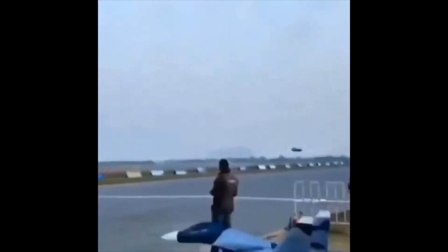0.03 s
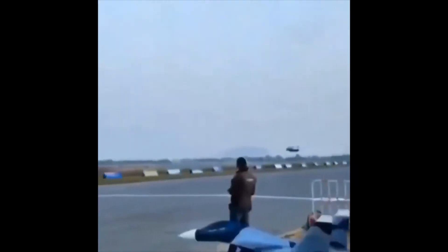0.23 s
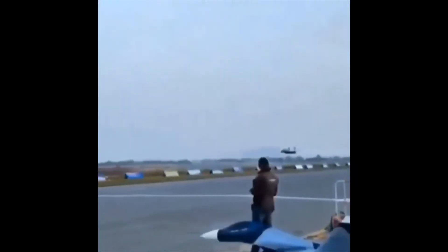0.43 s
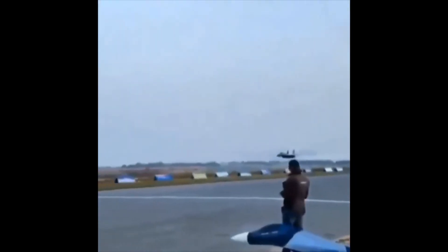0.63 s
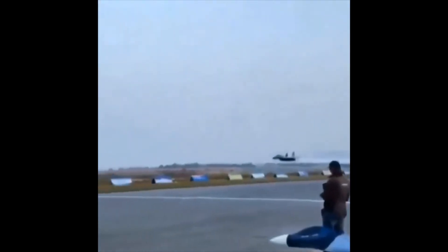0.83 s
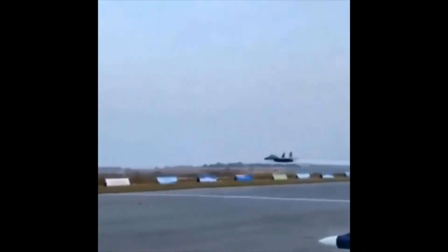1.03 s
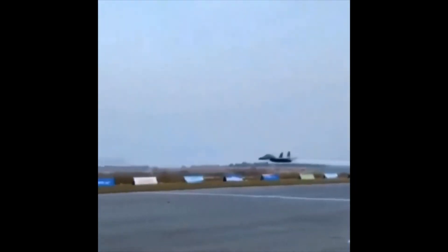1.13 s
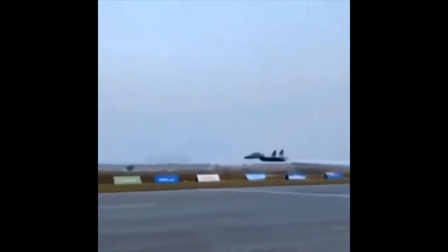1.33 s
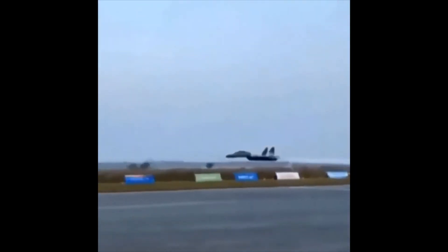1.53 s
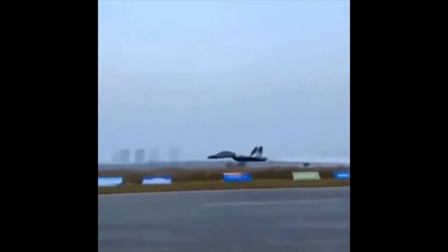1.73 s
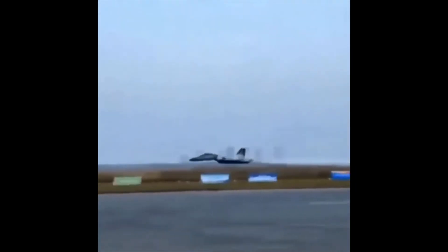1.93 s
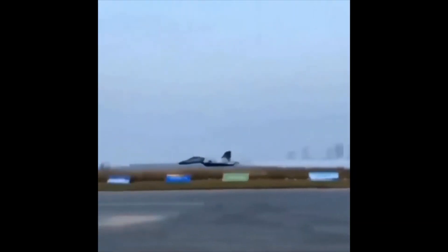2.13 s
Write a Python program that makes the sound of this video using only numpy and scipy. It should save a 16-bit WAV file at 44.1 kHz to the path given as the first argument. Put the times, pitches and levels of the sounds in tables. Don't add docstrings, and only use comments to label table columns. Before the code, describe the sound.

A fighter jet approaches low over an open airfield, its broad crackling roar swelling as howl and high fan whine flicker through; exhaust rumble deepens towards the end, with wind buffets on a thin, glitchy phone microphone.

```python
import sys
import numpy as np
from scipy import signal
from scipy.fft import rfft, irfft
from scipy.io import wavfile
from scipy.ndimage import uniform_filter1d

SR = 44100
rng = np.random.default_rng(int(sys.argv[2]) if len(sys.argv) > 2 else 0)


def file_out(sig):
    cols = np.atleast_2d(sig).T
    lim = np.clip(cols, -1, 1)
    pcm = np.round(lim * 32767).astype(np.int16)
    wavfile.write(sys.argv[1], SR, pcm)


def voltage_ratio(level):
    return 10 ** (np.asarray(level, float) / 20)


N = 96358
HOP, SIZE = 128, 1024
CROSSOVER_HZ = 5250
SMOOTH_BELOW_HZ = 700


def evened(x):
    return x / np.sqrt(np.mean(abs(x) ** 2) + 1e-20)


def bell(x, centre, width):
    return np.exp(-.5 * ((x - centre) / width) ** 2)


def plateau(x, centre, half):
    return np.exp(-((x - centre) / half) ** 4)


def band(hz, centre_hz, width_hz):
    shape = bell(hz, centre_hz, width_hz / 2)
    return shape / shape.sum(axis=0)


def grid():
    hz = np.fft.rfftfreq(SIZE, 1 / SR)[:, None]
    t = np.arange(N // HOP + 9)[None] * HOP / SR
    return hz, t


def noise(power):
    real, imaginary = rng.standard_normal(power.T.shape + (2,)).T
    spectrum = real + 1j * imaginary
    white = signal.istft(spectrum, nperseg=SIZE, noverlap=SIZE - HOP)[1]
    shaped = np.sqrt(power * len(power)) * spectrum
    return signal.istft(shaped, nperseg=SIZE, noverlap=SIZE - HOP)[1][:N] / np.std(white)


def patches(bins, frames):
    hz, t = grid()
    field = rng.standard_normal((t.size, hz.size)).T
    for _ in range(2):
        field = uniform_filter1d(field, size=bins, axis=0)
        field = uniform_filter1d(field, size=frames, axis=1)
    return evened(field)


def read(points, hz):
    f, value = np.transpose(points)
    return np.interp(np.log(hz + 1), np.log(f + 1), value)


# time_s, level_db
APPROACH = [(0.08, -41), (0.5, -36.5), (0.51, -46), (0.63, -33), (0.65, -37.5), (1.01, -37.5), (1.2, -33.5),
            (1.23, -35), (1.37, -32.5), (1.39, -34.5), (2.17, -33.5), (2.18, -33)]
# frequency_hz, level_db
FAR = [(18, -27), (130, 2.5), (1950, 2.5), (2350, -12.5), (3000, -12.5), (4900, -2), (5600, -26.5),
       (10000, -20)]
# frequency_hz, level_db
NEAR = [(18, -2.5), (800, -3), (1950, -3), (2350, -6.5), (3000, -7), (4900, -10.5), (5500, -16),
        (10000, -18.5)]


def roar(hz, t):
    near = np.clip((t - .11) / (.8 - .11), 0, 1)
    power = voltage_ratio(2 * ((1 - near) * read(FAR, hz) + near * read(NEAR, hz)))
    level_db = np.interp(t, *np.transpose(APPROACH)) - 3
    reference = (hz[:, 0] > 2200) & (hz[:, 0] < 8000)
    return power * voltage_ratio(2 * level_db) / power[reference].sum(axis=0)


def crackle(body):
    rate_per_s, spread_db, level_db = 1500, 3.0, -16
    strength_db = spread_db * np.minimum(rng.exponential(1, N), 5)
    size = voltage_ratio(strength_db) * (rng.random(N) < rate_per_s / SR)
    u = np.arange(0, .002, 1 / SR) / .0001
    front = (1 - u) * np.exp(-u)
    shocks = evened(np.convolve(size, front)[:N])
    loudness = np.sqrt(abs(uniform_filter1d(body ** 2, size=4000)))
    return voltage_ratio(level_db) * shocks * loudness


# centre_s, length_s, level_db
GUSTS = [
    (0.238, .03, -46.5),
    (0.608, .08, -66),
    (.95, .08, -55),
    (1.604, .03, -40),
    (1.877, .04, -50),
    (2.05, .05, -37.5),
    (2.18, .03, -28),
]


def wind():
    t = np.arange(N) / SR
    steady = voltage_ratio(2 * -53.5)
    power = steady + sum(voltage_ratio(2 * db) * bell(t, s0, span) for s0, span, db in GUSTS)
    spectrum = rfft(rng.standard_normal(N)) * bell(np.fft.rfftfreq(N, 1 / SR), 56.4, 11.8)
    return np.sqrt(power) * evened(irfft(spectrum, N))


# time_s, pitch_hz
PITCH = [(0, 9360), (1.0, 9410), (1.3, 9210), (1.7, 9110), (1.9, 8880), (2.2, 8860)]


def whine_pitch(t):
    return np.interp(t, *np.transpose(PITCH))


# centre_s, length_s, pitch_hz, width_hz, level_db
BEAMS = [(0.42, 0.069, 1620, 440, -34), (0.604, 0.027, 525, 40, -43.5), (0.84, 0.085, 584, 65, -41),
         (0.712, 0.055, 650, 190, -39.5), (1.95, .012, 7900, 1000, -40.5), (2.03, 0.063, 1240, 200, -37),
         (0.996, 0.066, 617, 180, -36.5), (1.326, 0.14, 564, 61, -32.5), (1.507, 0.045, 604, 30, -35),
         (0.95, 0.14, 265, 114, -41), (1.57, 0.24, 1700, 520, -37.5), (1.66, 0.033, 1590, 280, -34),
         (2.12, 0.046, 580, 65, -37), (0.83, .03, 553, 35, -37), (1.014, .03, 597, 43, -37),
         (1.37, 0.021, 590, 52, -35), (1.6, 0.033, 170, 51, -41), (.73, 0.023, 192, 34, -43),
         (1.62, 0.042, 5000, 240, -52), (1.84, 0.018, 1320, 120, -36.5), (1.97, 0.027, 1120, 120, -38.5),
         (1.8, 0.043, 410, 280, -36.5), (1.4, 0.014, 4100, 400, -45), (1.91, 0.07, 1300, 89, -37.5),
         (1.77, 0.11, 580, 110, -36.5), (0.42, 0.18, 3560, 1200, -39.5), (1.35, 0.035, 4350, 630, -39),
         (1.26, 0.046, 2600, 600, -53), (1.54, 0.07, 4200, 420, -40), (1.375, 0.02, 5700, 370, -41),
         (2.1, 0.28, 3450, 1600, -38.5), (0.77, 0.12, 3170, 370, -43.5), (0.19, 0.29, 560, 41, -49),
         (0.62, 0.038, 2000, 130, -41), (0.55, 0.02, 165, 50, -44), (0.48, 0.037, 2800, 260, -44)]


def beams(hz, t):
    doppler = whine_pitch(t) / 9200
    return sum(voltage_ratio(2 * db) * bell(t, s0, span) * band(hz, f * doppler, width)
               for s0, span, f, width, db in BEAMS)


# centre_s, length_s, level_db
WHINE = [
    (0.396, 0.096, -47),
    (0.74, 0.056, -54.5),
    (1.01, 0.12, -48.5),
    (1.298, 0.29, -53.5),
    (1.497, 0.01, -37),
    (1.58, .04, -49.5),
    (1.66, 0.043, -39),
    (1.747, 0.03, -36),
    (1.922, 0.038, -39.5),
    (2.112, 0.047, -41),
]


def whine(hz, t):
    swell = sum(voltage_ratio(2 * db) * bell(t, s0, span) for s0, span, db in WHINE)
    return swell * band(hz, whine_pitch(t), 210)


# time_s, rumble_hz, rumble_db, core_hz, core_db
EXHAUST = [(1.2, 340, -39.5, 1660, -43.5), (1.45, 307, -32, 1650, -41.5), (1.75, 303, -28, 1490, -41),
           (1.9, 272, -27.5, 1390, -30.5), (2.03, 240, -26, 1360, -33.5), (2.18, 189, -27, 1460, -29)]


def exhaust(hz, t):
    s, *columns = np.transpose(EXHAUST)
    rumble_hz, rumble_db, core_hz, core_db = (np.interp(t, s, c) for c in columns)
    rumble = plateau(hz, rumble_hz, 95) ** 2
    core = plateau(hz, core_hz, 480) ** 2
    power = voltage_ratio(2 * rumble_db) * rumble / rumble.sum(axis=0) + voltage_ratio(2 * core_db) * core / core.sum(axis=0)
    fade_in = plateau(np.minimum(t, s[0]), s[0], 0.23)
    return power * fade_in


def jet():
    hz, t = grid()
    power = roar(hz, t) + beams(hz, t) + whine(hz, t) + exhaust(hz, t)
    depth_db = np.where(hz > CROSSOVER_HZ, 1.5, .6)
    scatter_db = depth_db * patches(bins=6, frames=10)
    scatter_db += .5 * patches(bins=150, frames=4)
    scatter_db += 2.2 * (hz > SMOOTH_BELOW_HZ) * patches(bins=2, frames=24)
    return noise(power * voltage_ratio(2 * scatter_db))


def scene():
    body = jet()
    return (body + crackle(body) + wind())[None]


# centre_s, length_s, centre_hz, width_hz, cut_db
HOLES = [(1.72, .018, 2600, 250, -13), (1.82, .025, 2550, 170, -11), (1.95, .016, 2400, 300, -12),
         (1.225, .025, 990, 60, -12), (2.165, .02, 2400, 200, -13), (1.96, .022, 4050, 150, -14),
         (1.58, .025, 2400, 120, -11), (1.215, .025, 780, 45, -14), (1.89, .04, 2700, 90, -8),
         (2.07, .035, 2450, 100, -9), (1.5, .025, 2700, 150, -11), (1.95, .025, 8450, 90, -12),
         (1.84, .02, 7950, 200, -10), (1.92, .2, 820, 130, -3), (1.9, .3, 9900, 350, -5),
         (1.49, .022, 6600, 200, -11), (.94, .025, 430, 40, -12), (.7, .025, 8750, 120, -13),
         (.375, .03, 6250, 350, -20), (.8, .025, 7950, 250, -18), (.27, .03, 5600, 150, -18),
         (.33, .07, 8500, 120, -12), (.785, .045, 5000, 140, -20), (1.495, .028, 5400, 230, -20),
         (1.585, .035, 5250, 230, -20), (1.6, .04, 8400, 110, -18), (1.853, .022, 5900, 300, -22),
         (2.07, .11, 5520, 130, -22), (2.088, .024, 9950, 450, -45), (.32, .08, 2500, 80, -14),
         (.68, .05, 2450, 70, -14), (1.78, .06, 2400, 90, -10), (1.5, .025, 3250, 120, -13),
         (.715, .02, 840, 50, -12), (1.37, .04, 3250, 100, -14), (1.59, .03, 6600, 110, -15),
         (1.555, .018, 3300, 130, -12), (2.155, .03, 5600, 220, -35), (.655, .04, 5400, 150, -16)]


def emptied_db(hz, t):
    cut_db = 1.4 * sum(db * plateau(t, s0, span) * plateau(hz, f, width) for s0, span, f, width, db in HOLES)
    chance = patches(bins=3, frames=10)[:, :t.size]
    cut_db = cut_db - 18 * np.clip(2 * (chance - 1.35), 0, 1) * (hz > 2200)
    bins, frames = 8, 8
    tiles = rng.standard_normal((t.size // frames + 1, hz.size // bins + 1)).T
    tiles = np.kron(tiles, np.ones((bins, frames)))[:hz.size, :t.size]
    return cut_db + 3 * tiles * (hz > CROSSOVER_HZ)


# centre_s, length_s, level_db
WIDE = [
    (0.087, .012, -68),
    (0.373, 0.011, -50),
    (0.471, 0.0085, -47),
    (1.497, 0.011, -59),
]


def band_limit(hz, t):
    edge_hz = 10120 - 70 * t
    top = sum(voltage_ratio(db + 55) * plateau(t, s0, span) for s0, span, db in WIDE)
    return np.where(hz < edge_hz, 1, top * (hz < 10800))


# centre_s, length_s, cut_db, lowest_hz, edge_steepness
GAPS = [
    (.5245, .030, -46, 0, 5),
    (.728, .015, -20, 400, 2),
    (1.111, .020, -18, 700, 2),
    (1.238, .024, -20, 400, 2),
]
# pitch_hz, level_db
FROZEN = [
    [(200, -48), (323, -42.5), (1104, -44), (1270, -41), (1534, -45), (1766, -49), (1986, -39.5),
     (3009, -48), (3225, -45), (3526, -45), (3688, -48), (3903, -50), (4064, -50), (4231, -49), (4635, -44),
     (4850, -50)],
    [(581.4, -35.5), (1701, -41), (3106, -43), (4054, -44), (5480, -55), (5905, -64), (6761, -49),
     (7547, -70), (9292, -42.5)],
    [(1453, -41), (2164, -50), (2449, -44), (3165, -41.5), (3601, -48), (3849, -45), (4474, -46),
     (4834, -55), (5405, -44.5), (5970, -67), (6821, -73), (7149, -72), (7892, -64), (9033, -50),
     (9943, -77)],
    [(619.1, -34.5), (1238, -40.5), (1642, -36), (2030, -41), (2950, -43.5), (3391, -54), (3903, -66),
     (4334, -53), (4775, -44), (5163, -46), (6971, -69), (8059, -63), (8861, -64), (9249, -52)],
]


def dropouts(x):
    t, hz = np.arange(N) / SR, np.fft.rfftfreq(N, 1 / SR)
    for (s0, span, cut_db, lowest_hz, steep), lines in zip(GAPS, FROZEN):
        dip = np.exp(-abs((t - s0) / (span / 2)) ** steep)
        left = 1 - (1 - voltage_ratio(cut_db)) * dip
        tones = sum(voltage_ratio(db + .5) * np.sin(2 * np.pi * (f * t + rng.random())) for f, db in lines)
        upper = irfft(rfft(x) * (hz >= lowest_hz), N)
        x = x - (1 - left) * upper + np.sqrt(2 * (1 - left ** 2)) * tones
    return x


def low_pass(x):
    return signal.sosfilt(signal.butter(12, 11030, fs=SR, output="sos"), x)


def record(dry):
    ceiling = .33
    x = ceiling * np.tanh(dry[0] / ceiling)
    x = signal.sosfilt(signal.butter(3, 45, "high", fs=SR, output="sos"), x)
    hz, t, z = signal.stft(x, SR, nperseg=SIZE, noverlap=SIZE - HOP)
    hz = hz[:, None]
    relief = abs(z) / (uniform_filter1d(abs(z), size=9, axis=0) + 1e-12)
    z = z * relief ** (.22 * (hz > SMOOTH_BELOW_HZ))
    z = z * voltage_ratio(emptied_db(hz, t)) * band_limit(hz, t)
    x = signal.istft(z, SR, nperseg=SIZE, noverlap=SIZE - HOP)[1][:N]
    switch_on = np.clip((np.arange(N) / SR - .0658) / .0004, 0, 1)
    x = dropouts(x) * switch_on
    return low_pass(x[None])


dry = scene()
out = record(dry)
file_out(out)
```